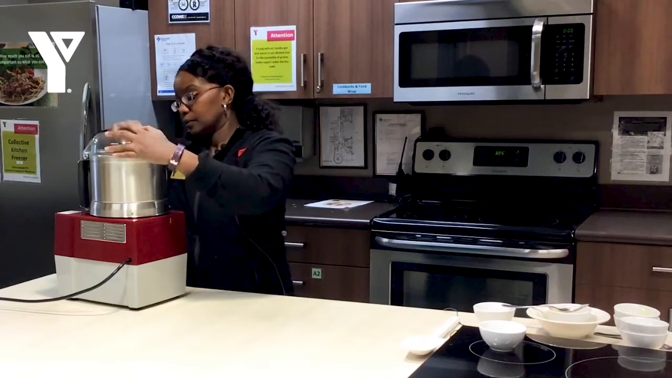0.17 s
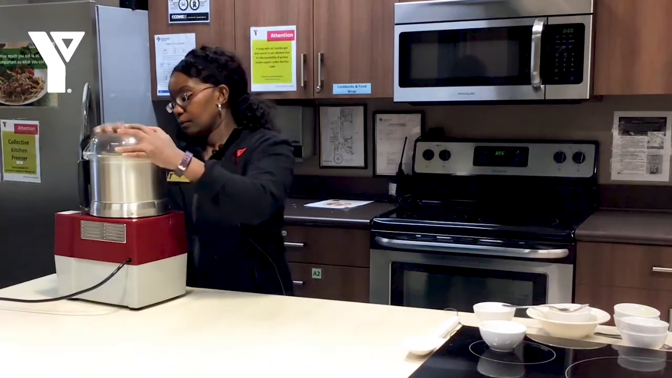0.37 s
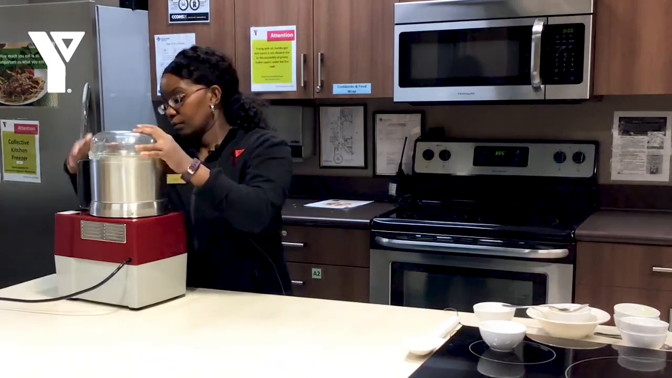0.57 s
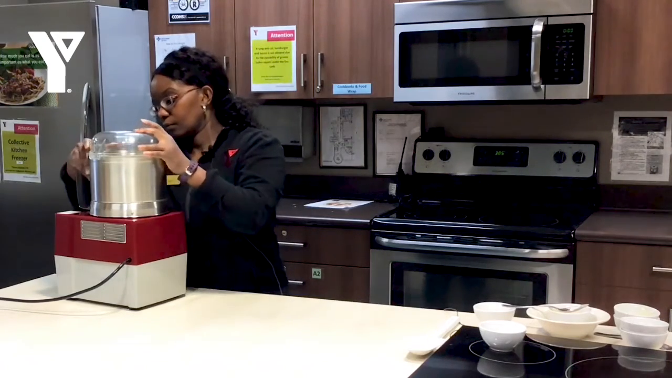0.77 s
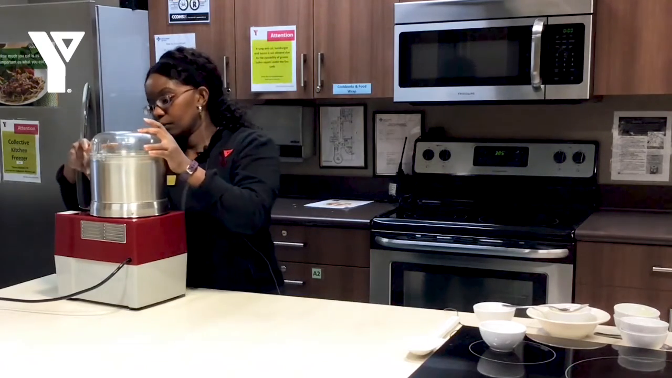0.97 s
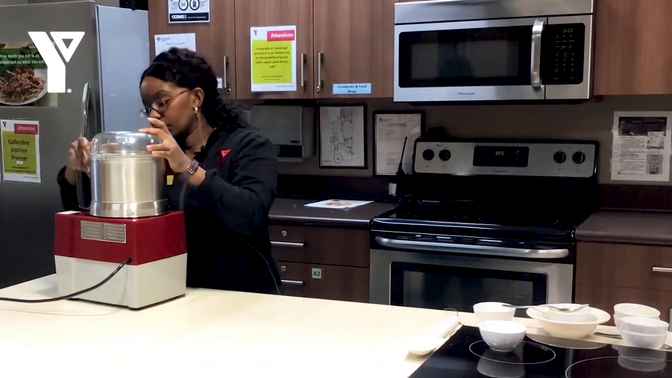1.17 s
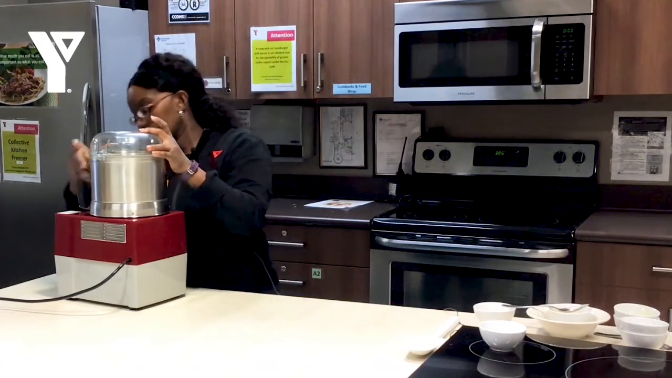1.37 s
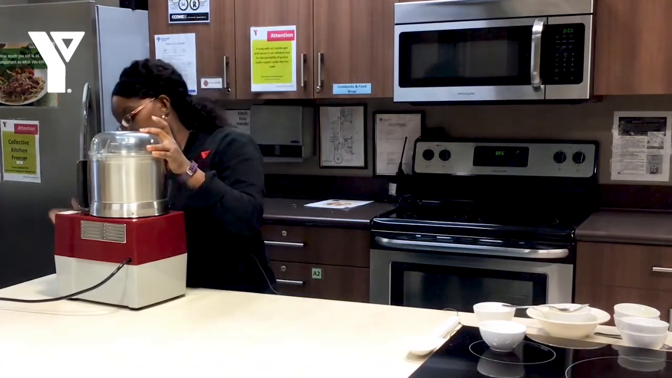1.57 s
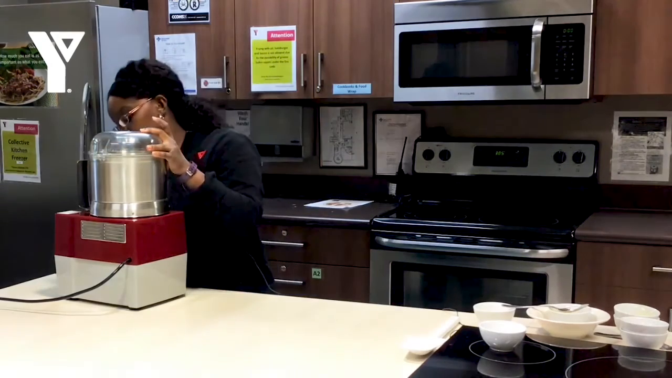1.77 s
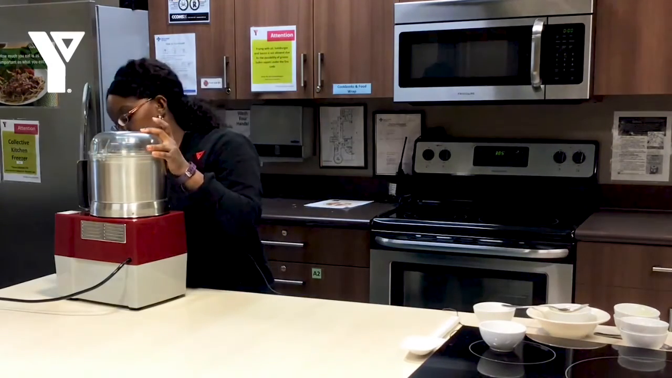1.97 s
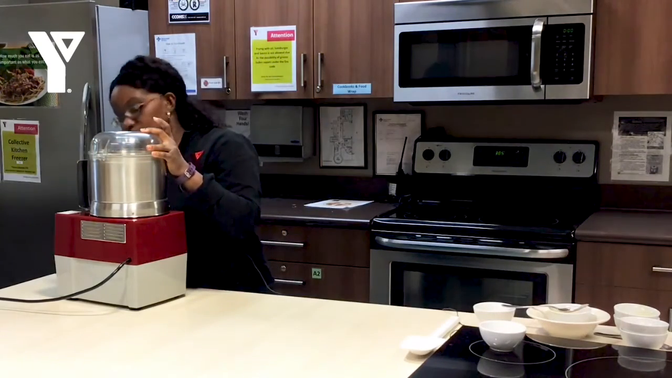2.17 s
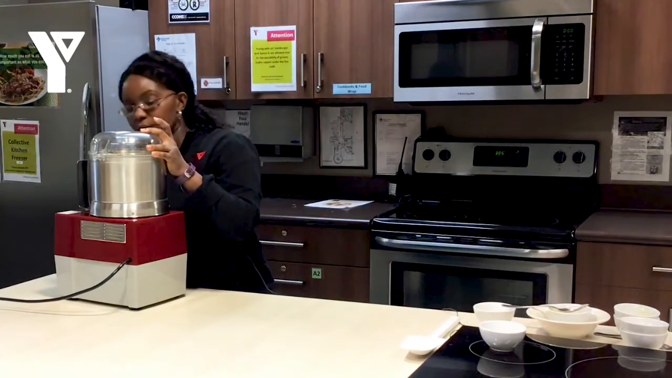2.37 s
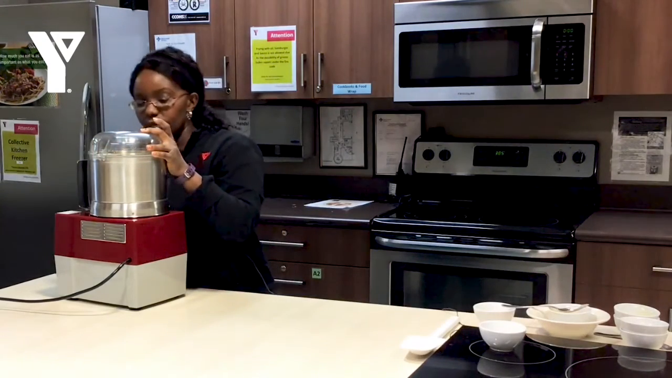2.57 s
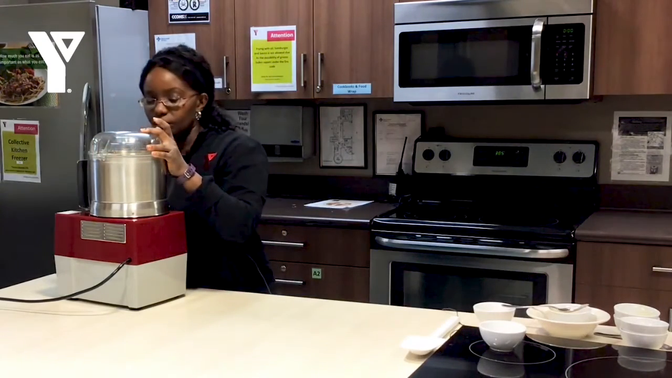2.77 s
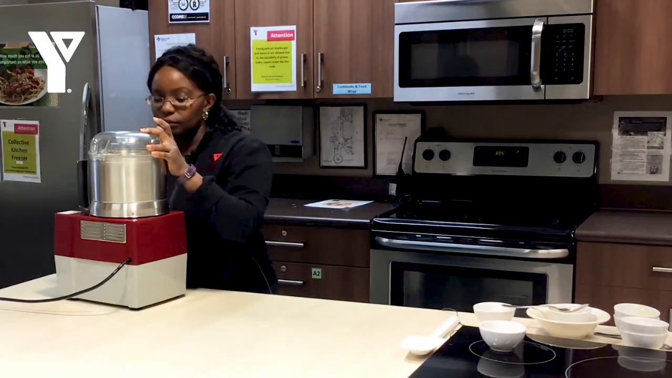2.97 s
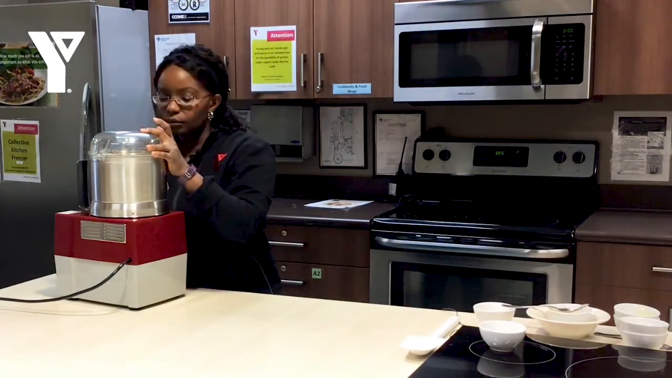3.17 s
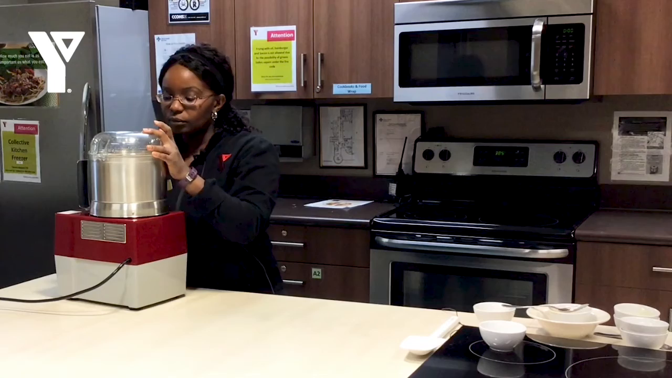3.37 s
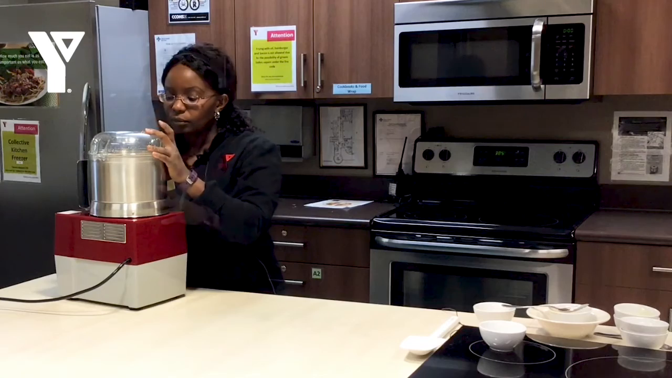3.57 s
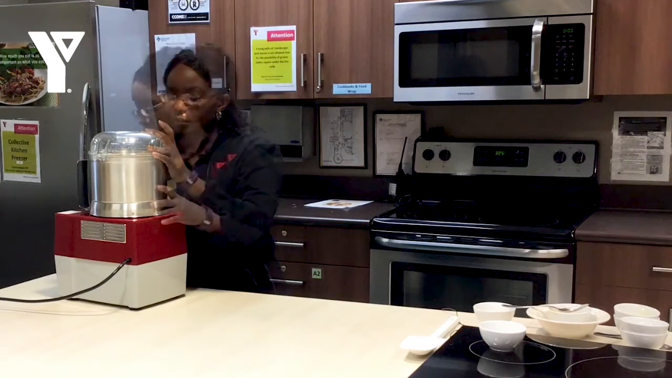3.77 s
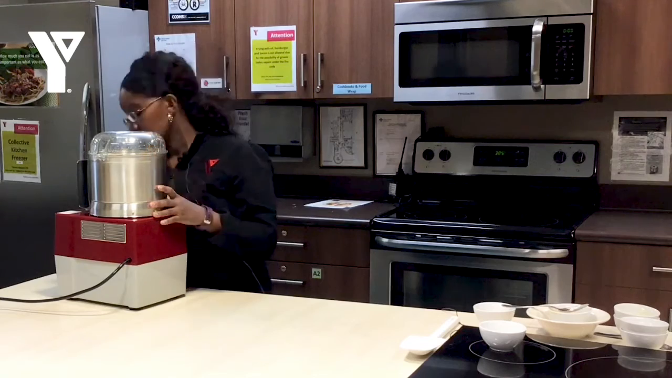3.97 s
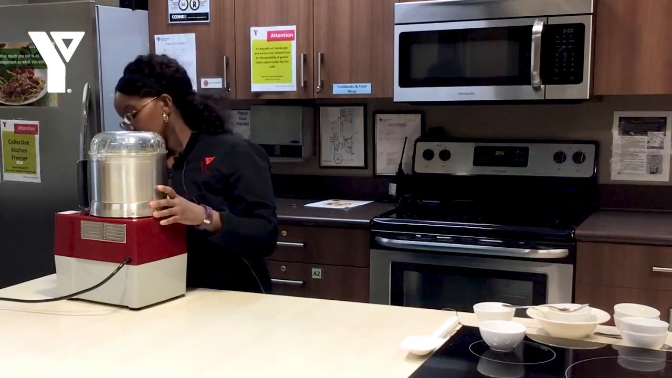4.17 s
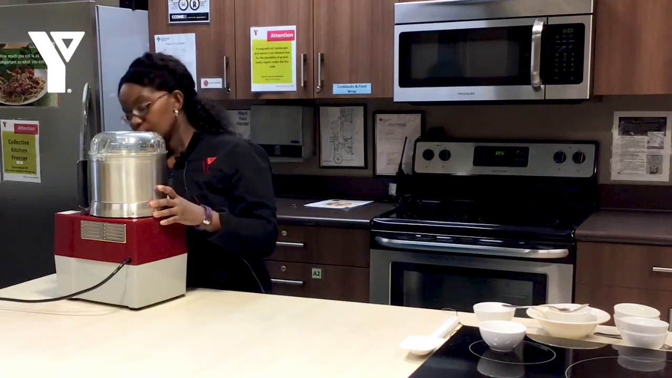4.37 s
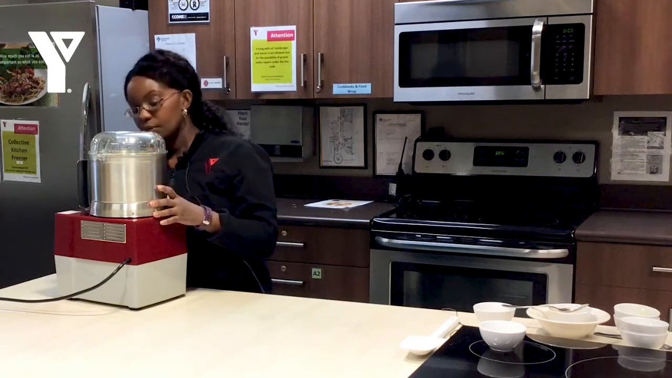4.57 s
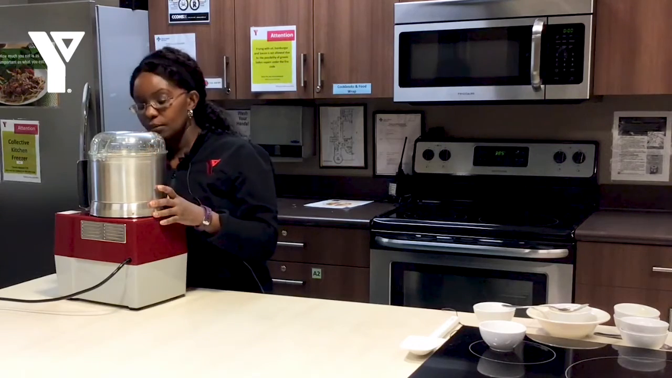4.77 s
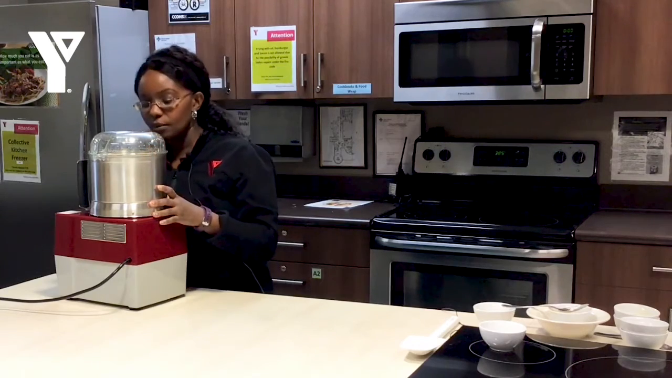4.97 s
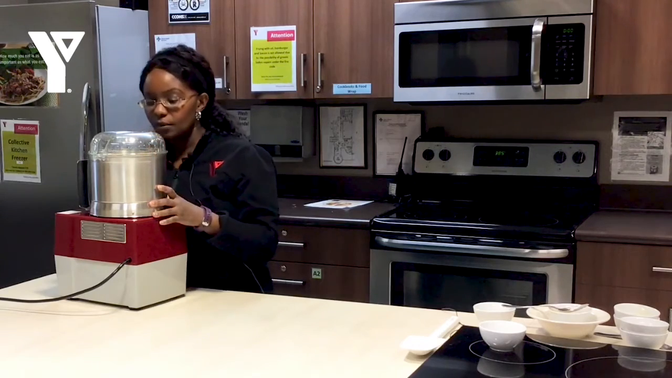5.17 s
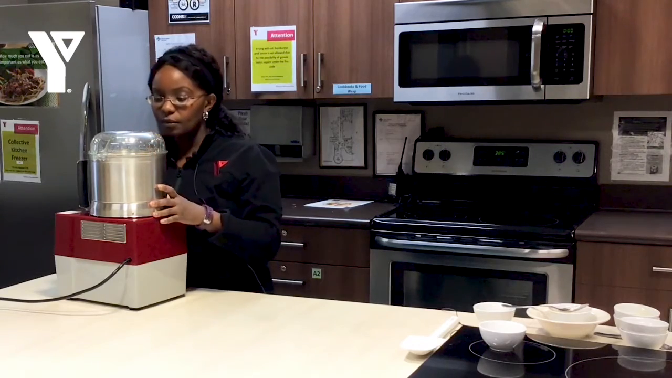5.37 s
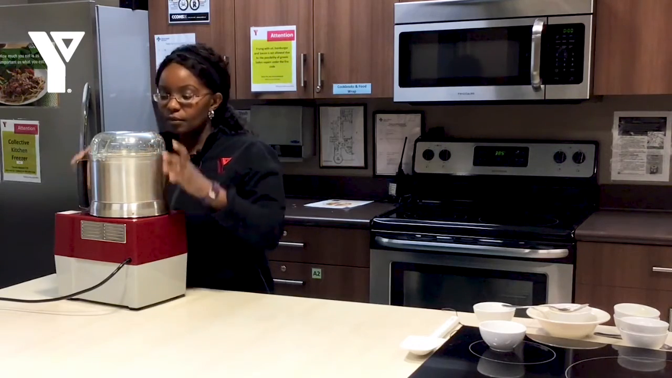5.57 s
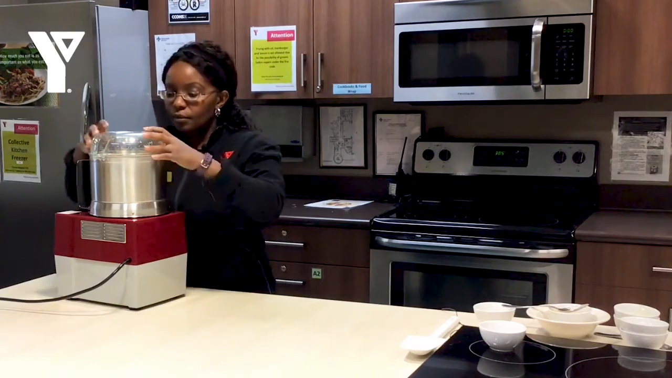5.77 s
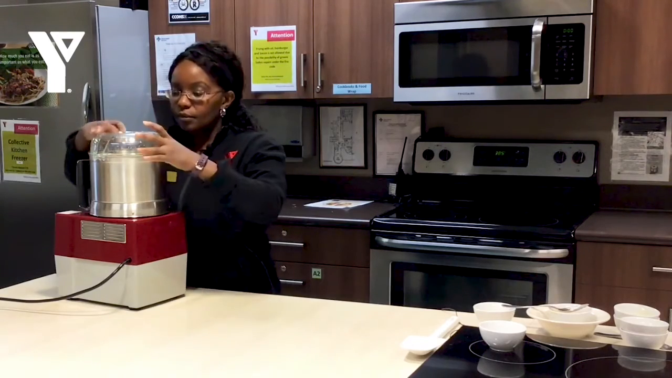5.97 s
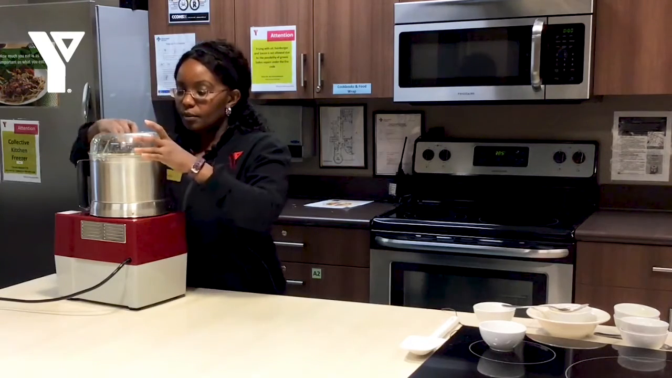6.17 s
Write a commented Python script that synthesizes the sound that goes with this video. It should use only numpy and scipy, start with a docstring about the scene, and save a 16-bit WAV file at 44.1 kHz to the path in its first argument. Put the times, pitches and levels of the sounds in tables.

```python
"""Food processor in a small kitchen

Place: a small hard room with ventilation; a steel-bowled food processor stands on the counter.
Distance: close, the direct sound well above the room. The plastic lid is slid on, knocked home and latched.
The motor starts with a clack, the blade flings food at the bowl for nearly three seconds, then coasts to rest.
Food, air and rubbing are shaped noise; hum, squeal and drone are sines; knocks are decaying noise and modes.
Microphone: the loudest blows overload it, and it hears nothing above its band limit."""
import sys
import numpy as np
from scipy import signal
from scipy.fft import rfft, irfft, next_fast_len
from scipy.io import wavfile
from scipy.ndimage import map_coordinates

SR = 44100
rng = np.random.default_rng(int(sys.argv[2]) if len(sys.argv) > 2 else 0)


def pcm_store(signal):
    """Save signal as 16-bit PCM."""
    levels = np.round(np.clip(np.atleast_2d(signal), -1, 1) * 32767)
    wavfile.write(sys.argv[1], SR, levels.astype(np.int16).T)


N = 273552

# ventilation spectrum: (frequency [Hz], relative level [dB])
AIR_SPECTRUM = [(12, -27), (20, -1.5), (70, -13), (255, -13), (285, -18), (388, -17), (472, -21),
                (678, -24.5), (738, -32), (849, -27), (1760, -41), (4810, -52), (16000, -63)]
# answer of cupboards and walls: (frequency [Hz], decay by 60 dB [s], strength [dB])
ROOM_DECAY = [(149.7, 0.14, -5.5), (497, .4, -3.5), (1500, 0.5, -3.5), (3500, .41, -4), (5000, 0.38, -5.5),
              (6840, 0.15, -5), (14040, 0.21, -9.5)]
# fingers rubbing the lid, spectrum: (frequency [Hz], relative level [dB])
RUB_SPECTRUM = [(300, -18), (600, -7), (1500, -18), (2800, -3), (5000, -4.5), (9000, -4), (13500, -7),
                (16000, -14.5)]
# strokes over the lid: (time of the top [s], level [dB], rise time constant [s],
# fall time constant [s], lower edge of the hiss [Hz])
LID_STROKES = [(.01, -50, .02, 0.048, 300), (.27, -57, 0.12, 0.19, 2000), (.51, -43.5, 0.049, 0.03, 300),
               (.94, -54, 0.071, 0.045, 297.4), (1.42, -51, 0.031, 0.018, 7490),
               (5.75, -65, 0.052, .13, 2487), (5.96, -63, 0.044, .04, 6020),
               (6.16, -45.5, 0.03, .035, 4240)]
# the lid drags on the bowl's rim: (time of the top [s], level [dB])
RIM_DRAGS = [(.21, -44.5), (.47, -41), (6.161, -50)]
# fingers tap the plastic: (time [s], clack level [dB], clack pitch [Hz], tick level [dB])
FINGER_TAPS = [(0.209, -45, 2300, -51), (.302, -45.5, 3180, -46), (.722, -54.5, 2500, -54),
               (.765, -56, 3014, -53), (1.973, -45, 1397, -62), (5.826, -57, 3820, -52)]
# the lid is knocked into place: (time [s], clack level [dB], clack pitch [Hz], tick level [dB],
# thump level [dB], thump pitch [Hz], ring level [dB], room level relative to the blow [dB])
LID_KNOCKS = [ (-.012, -14.5, 2200, -21.5, -14, 334, -18, -8.5), (.002, -15.5, 715, -37, -20, 151, -35, -7),
              (0.5093, -18, 1920, -22, -19, 193, -17, -13.5),
              (.533, -13.5, 430, -49, -19.5, 212.2, -28, -24.5),
              (.582, -12, 511, -47, -13.5, 210, -21, -21.5),
              (.867, -28.5, 1910, -23.5, -39.5, 207, -42.5, -13),
              (.970, -2.5, 2000, -7, -8.5, 763, 0.5, -14.5), (.978, 0, 905, -24.5, -9, 243, -13, -16)]
# clacks at start, switch-off and standstill: (time [s], clack level [dB], clack pitch [Hz],
# tick level [dB], thump level [dB], room level relative to the blow [dB])
DRIVE_CLACKS = [ (2.082, -3.5, 1230, -15, -5, -8.5), (2.110, -5.5, 2470, -33.5, -1.5, -24.5),
                (4.875, -7.5, 3440, -12.5, -17, -16), (5.277, -17, 1450, -47, -19.5, -19),
                (5.277, -23, 3000, -54, -45, -22), (5.297, -30, 1020, -42, -26, -8)]
# ticks of hard edges, spectrum: (frequency [Hz], relative level [dB])
TICK_SPECTRUM = [(2000, -22), (3500, 4.5), (4700, 1.5), (7000, -3), (9000, -9), (13500, -7), (16000, -18)]
# bowl and lid ringing together: (frequency [Hz], relative level [dB], decay by 60 dB [s])
RING_MODES = [(320, -10, .3), (388, -12.5, 0.28), (472, -2, 0.096), (526, 0, 0.36), (652, -5.5, 0.11),
              (754, -16.5, 0.061), (934, -9.5, 0.11), (1006, -11, .1), (1270, -19.5, 0.23),
              (1648, -29, .15), (2374, -26, .12), (3400, -24, .14), (4721, -26.5, .08)]
# mains harmonics in the motor: (frequency [Hz], relative level [dB])
HUM_HARMONICS = [(120, -12.5), (240, -2.5), (360, -3.5)]
# shaking by the unevenly loaded blade: (multiple of the shaft speed [1], level at full speed [dB])
SHAFT_SHAKE = [(1, -53.5), (3, -31.5)]
# level of the food noise, which drops near 3.8 s: (time [s], level [dB])
FOOD_LEVEL = [(2.25, -17), (2.58, -16.5), (2.85, -18.5), (3.58, -18), (3.9, -25), (4.35, -25.5), (4.72, -24),
              (4.86, -25)]
# thuds of the food on the bowl, spectrum: (frequency [Hz], relative level [dB])
CHURN_SPECTRUM = [(100, -47), (150, -22.5), (178, -12), (225, 1.5), (260, 0), (320, -5.5), (385, -5),
                  (430, -15), (520, -21), (900, -58.5)]
# crumbs on the wall before the steel rings, spectrum: (frequency [Hz], relative level [dB])
SPATTER_SPECTRUM = [(330, -18.5), (480, -6), (560, 2), (680, -0.5), (800, -4), (1150, -6), (1300, -12),
                    (1450, -16), (2000, -20.5), (2400, -17), (3200, -20), (4500, -24), (7000, -45.5)]
# fine spray, spectrum: (frequency [Hz], relative level [dB])
SPRAY_SPECTRUM = [(2500, -13), (4500, 0.5), (5500, 1.5), (7200, 1.5), (10000, -2.5), (13000, -4),
                  (15000, -11), (16000, -10.5)]
# resonances of the steel wall: (frequency [Hz], width [Hz], level [dB])
BOWL_MODES = [(535, 16, -9), (684, 54, -5), (872, 22, 4), (1095, 63, -7.5), (1236, 43, -3),
              (2376, 110, -10)]
# big lumps hit the blade: (time [s], level [dB])
BIG_LUMPS = [(2.13, -11.5), (2.319, -6.5), (2.451, -10), (2.63, -12), (3.21, -23), (3.43, -11.5),
             (3.54, -17), (4.08, -18.5), (4.282, -14.5), (4.542, -16.5), (4.67, -14.5), (4.76, -13.5),
             (5.05, -28)]
# wet food slaps the wall: (time [s], spatter level [dB], spray level [dB])
WET_SPLASHES = [(2.178, -10.5, -22), (3.428, -18.5, -33)]

ON_S, OFF_S = 2.082, 4.863  # the motor gets and loses its current
TURNS_PER_S, SPIN_UP_S, COAST_S = 59.2, 0.035, 0.42  # full speed, time constant of the start, time to rest
LID_DECAY_S, DRIVE_DECAY_S = 0.042, 0.033  # decay by 60 dB of lid and drive clacks
HOUSING_HZ = 259  # thump of the housing


def amp(db):
    """Decibels to gain."""
    return 10 ** (np.asarray(db) / 20)


def unit(x):
    """Scale to rms 1."""
    return x / np.sqrt(np.mean(x ** 2) + 1e-20)


def seconds():
    """Time of every sample [s]."""
    return np.arange(N) / SR


def since(start_s):
    """Seconds since start_s, zero before."""
    return np.maximum(seconds() - start_s, 0)


def ramp(start_s, end_s):
    """Rises from 0 at start_s to 1 at end_s."""
    return np.clip((seconds() - start_s) / (end_s - start_s), 0, 1)


def swell(top_s, rise_s, fall_s):
    """Gain that grows exponentially to 1 at top_s and dies away again."""
    t = seconds() - top_s
    return np.exp(-np.abs(t / np.where(t < 0, rise_s, fall_s)))


def wobble(rate):
    """A smooth random curve through normal knots, rate of them a second."""
    knots = rng.standard_normal(int(N * rate / SR) + 4)
    return map_coordinates(knots, [np.arange(N) * rate / SR])


def along(points, hz):
    """Interpolate (frequency [Hz], value) points on a log axis."""
    point_hz, values = np.transpose(points)
    return np.interp(np.log(hz + 1), np.log(point_hz + 1), values)


def filtered(x, response):
    """Filter x by a complex response, a function of frequency."""
    size = next_fast_len(len(x) + SR // 2)
    spectrum = rfft(x, size) * response(np.fft.rfftfreq(size, 1 / SR))
    return irfft(spectrum, size)[:len(x)]


def coloured(x, spectrum):
    """Shape x by a spectrum table, at rms 1."""
    return unit(filtered(x, lambda hz: amp(along(spectrum, hz))))


def noise(spectrum, size=N):
    """Noise of rms 1 with a spectrum."""
    return coloured(rng.standard_normal(size), spectrum)


def band_noise(centre_hz, q, size, order=1):
    """Noise of rms 1 through a resonance, applied order times; it also dulls above four times its centre."""
    def response(hz):
        damping = 1j * hz * centre_hz / q
        resonance = damping / (centre_hz ** 2 - hz ** 2 + damping)
        return resonance ** order / (1 + (hz / (4 * centre_hz)) ** 2)

    return unit(filtered(rng.standard_normal(size), response))


def impacts(rate, spread_db):
    """Random blows of either sign and uneven size, on average rate a second."""
    struck = rng.random(N) < rate / SR
    size_db = spread_db * np.minimum(rng.standard_normal(N), 2)
    return unit(struck * rng.choice([-1, 1], N) * amp(size_db))


def ventilation():
    """A steady rush of air with a faint fan tone."""
    rush = amp(-48.5 + 0.7 * wobble(6)) * noise(AIR_SPECTRUM)
    tone = np.sin(2 * np.pi * 384 * seconds() + 0.5 * wobble(1.3))
    return rush + amp(-60 + 2 * wobble(1)) * tone


def kitchen(x):
    """Cupboards and walls answer with decaying noise; each frequency dies at its own speed."""
    hz, t, grains = signal.stft(rng.standard_normal(SR // 2), SR, nperseg=256)
    t60 = along([(f, life) for f, life, db in ROOM_DECAY], hz)[:, None]
    strength_db = along([(f, db) for f, life, db in ROOM_DECAY], hz)[:, None]
    tail = signal.istft(grains * amp(strength_db - 60 * t / t60), SR, nperseg=256)[1]
    delayed = np.pad(x, (300, 0))  # samples of delay
    return signal.fftconvolve(delayed, tail / np.linalg.norm(tail))[:len(x)]


def sliding():
    """Fingers rub the lid with a fine, uneven hiss; the lid drags lower on the rim."""
    rub = noise(RUB_SPECTRUM)
    hiss = np.zeros(N)
    for top_s, db, rise_s, fall_s, edge_hz in LID_STROKES:
        above_edge = unit(filtered(rub, lambda hz: 1 - 1 / (1 + (hz / edge_hz) ** 8)))
        hiss += amp(db) * swell(top_s, rise_s, fall_s) * above_edge
    drag_gain = sum(amp(db) * swell(top_s, rise_s=0.035, fall_s=0.035) for top_s, db in RIM_DRAGS)
    drag = drag_gain * band_noise(496, q=1.6, size=N, order=2)
    return (hiss + drag) * amp(1.5 * wobble(37))


def contact(clack_db, clack_hz, tick_db, thump_db, thump_hz, ring_db, room_db, t60=LID_DECAY_S):
    """A clack with a sharp tick; it thumps the housing and counter, rings the bowl and wakes the room."""
    size = 3 * SR // 4
    t = np.arange(size) / SR
    pitched = np.sin(2 * np.pi * clack_hz * t) * np.exp(-t * clack_hz / 3)  # heavily damped: three cycles
    clack = amp(clack_db) * (0.92 * band_noise(clack_hz, q=2.4, size=size) + 1.9 * pitched)
    tick = amp(tick_db) * noise(TICK_SPECTRUM, size)
    snap = (clack + tick) * amp(-60 * t / t60) * (1 - np.exp(-t / 0.001))

    body = np.sin(2 * np.pi * thump_hz * t) + 1.1 * band_noise(thump_hz, q=1.7, size=size, order=2)
    thump = amp(thump_db - 60 * t / 0.12) * body * (1 - np.exp(-t / 0.01))

    ring = np.zeros(size)
    for hz, db, life in RING_MODES:
        mode_gain = amp(db + rng.normal(0, 1) - 60 * t / life)
        ring += mode_gain * np.sin(2 * np.pi * (hz * t + rng.random()))
    held = (0.1 + np.exp(-t / 0.011)) * (1 - np.exp(-t / 0.0003))  # the seated lid soon damps most of it

    hit = snap + thump + amp(ring_db) * ring * held
    little_bass = signal.butter(2, 120, "highpass", fs=SR, output="sos")  # small parts radiate little bass
    hit = signal.sosfilt(little_bass, hit)
    boom_gain = amp(thump_db - 26 - 60 * t / 0.7) * (1 - np.exp(-t / 0.006))
    counter_boom = boom_gain * band_noise(31, q=1.6, size=size, order=2)
    return hit + counter_boom + amp(room_db) * kitchen(hit)


def contacts():
    """Lid knocks, machine clacks and finger taps, each at its moment."""
    hits = [(s, contact(*blow)) for s, *blow in LID_KNOCKS]
    for s, db, hz, tick_db, thump_db, room_db in DRIVE_CLACKS:
        hits.append((s, contact(db, hz, tick_db, thump_db, HOUSING_HZ, db - 31, room_db, DRIVE_DECAY_S)))
    for s, db, hz, tick_db in FINGER_TAPS:
        hits.append((s, contact(db, hz, tick_db, db - 1.5, HOUSING_HZ, db - 15.5, room_db=-16.5)))
    out = np.zeros(N + 2 * SR)  # a second of margin at both ends
    for s, hit in hits:
        start = SR + round(s * SR)
        out[start:start + len(hit)] += hit
    return out[SR:SR + N]


def pace():
    """Share of full speed: a quick spin-up, then friction slows the blade evenly after switch-off."""
    return (1 - np.exp(-since(ON_S) / SPIN_UP_S)) * (1 - ramp(OFF_S, OFF_S + COAST_S))


def shaft_angle():
    """Angle of the slightly unsteady shaft [rad]."""
    return 2 * np.pi * np.cumsum(TURNS_PER_S * pace() * (1 + 0.013 * wobble(12))) / SR


def driven(usual_db, per_level_db, speed_power):
    """Gain that follows the food level and speed: usual_db at the mean food level, per_level_db gained per dB
    of it."""
    level_db = np.interp(seconds(), *np.transpose(FOOD_LEVEL))
    return amp(usual_db + per_level_db * (level_db - level_db.mean())) * pace() ** speed_power


def motor():
    """Windings hum on mains multiples, surging at the start; the unevenly loaded blade shakes the housing."""
    t = seconds()
    hum = sum(amp(db + 2.3 * wobble(8.5)) * np.sin(2 * np.pi * hz * t + 0.083 * wobble(5.5))
              for hz, db in HUM_HARMONICS)
    surge = amp(9.8 * np.exp(-since(ON_S) / 0.52))
    current = surge * (1 - ramp(OFF_S - 0.03, OFF_S))
    turn = shaft_angle()
    shake = sum(amp(db + 2.3 * wobble(14)) * np.sin(k * turn) for k, db in SHAFT_SHAKE)
    shake_gain = pace() ** 3 * (1 - ramp(OFF_S, OFF_S + 0.08))
    # the hum is louder after the food noise drops
    hum_gain = driven(-32, per_level_db=-1.6, speed_power=0.3)
    return hum_gain * current * hum + shake * shake_gain


def rocking():
    """The start jolts the housing on its feet; it settles to a slight rocking."""
    sway = noise([(15, 7), (35, 5.5), (60, 10), (100, -11.5), (160, -26.5)])  # (Hz, relative dB)
    steady, jolt = amp(-47.5), amp(-26.5) * np.exp(-since(ON_S) / 0.15)
    return sway * pace() * (steady + jolt)


def coasting():
    """The slowing blade leaves the housing droning at one wavering pitch."""
    drone = np.sin(2 * np.pi * 252 * seconds() + 0.5 * wobble(30))
    return amp(-21.5) * ramp(OFF_S, OFF_S + 0.27) * pace() * drone


def squeal():
    """The blade drags through the resting food with a squeal that falls from 2120 Hz."""
    start_s, length_s, octaves_per_s = 2.110, 0.063, 24
    hz = 2120 * 2 ** (-octaves_per_s * since(start_s)) * (1 + 0.0079 * wobble(300))
    arch = np.sqrt(np.abs(np.sin(np.pi * ramp(start_s, start_s + length_s))))
    return arch * amp(-26 + 1.8 * wobble(200)) * np.sin(2 * np.pi * np.cumsum(hz) / SR)


def sizzle():
    """The treble of the spray: a fizz that fades after the start and a narrow, climbing hiss."""
    top_s, top_hz, climb_hz_per_s, width_hz = 4.5, 7051, 601.5, 599
    phase = 2 * np.pi * np.cumsum(top_hz + climb_hz_per_s * (seconds() - top_s)) / SR
    # slow noise on a carrier and its quadrature makes a narrow moving band
    narrow = unit(wobble(2 * width_hz) * np.cos(phase) + wobble(2 * width_hz) * np.sin(phase))
    # the absolute value in swell takes the sign off fall_s
    hiss = amp(-42.5) * swell(top_s, rise_s=2.8, fall_s=-0.5) * narrow
    fizz = band_noise(12900, q=3, size=N, order=2) * np.exp(-since(ON_S) / 0.7)
    return (hiss + amp(-36.5) * fizz) * pace() ** 2


def chips(speed):
    """A few times a turn a hard bit strikes the wall and rings a high mode; the bits are ground down."""
    t = np.arange(SR // 10) / SR
    pings = np.zeros(N)
    # (frequency [Hz], relative level [dB], decay by 60 dB [s])
    for hz, db, t60 in [(2362, 4.5, 0.028), (2620, 0.5, 0.016), (2854, -5.5, 0.011), (4700, -33.5, 0.02)]:
        ring = unit(np.sin(2 * np.pi * hz * t) * amp(-60 * t / t60))
        pings += amp(db) * signal.fftconvolve(impacts(3 * speed, spread_db=5.5), ring)[:N]
    wear_db_per_s = 7
    return unit(pings) * amp(-31.5 - wear_db_per_s * since(ON_S)) * pace() ** 1.5


def steel(hz):
    """The bowl wall passes every blow and rings on at its resonances."""
    response = 1
    for centre_hz, width_hz, db in BOWL_MODES:
        damping = 1j * hz * width_hz
        response = response + amp(db) * damping / (centre_hz ** 2 - hz ** 2 + damping)
    return response


def blending():
    """Two blade tips sweep the food round: lumps thud, crumbs spatter on the steel, fine spray hisses."""
    speed = TURNS_PER_S * pace()  # turns per second
    turn = shaft_angle()
    sweep = 1 + 0.078 * np.cos(turn) + 0.054 * np.cos(2 * turn)  # each passing tip throws a small burst
    tumble = wobble(28)  # food falls back on the blade in clumps

    lumps = coloured(impacts(30 * speed, spread_db=0.5) * sweep ** 2, CHURN_SPECTRUM)
    lumps = lumps * amp(0.44 * tumble)
    crumbs = coloured(impacts(60 * speed, spread_db=0.5) * sweep, SPATTER_SPECTRUM)
    crumbs = unit(filtered(crumbs, steel)) * amp(0.16 * tumble + 1.4 * wobble(60))
    scrape = band_noise(1870, q=0.78, size=N, order=3) * sweep ** 2 * amp(2.8 * wobble(160))
    spray = noise(SPRAY_SPECTRUM) * sweep * amp(0.5 * tumble + 0.6 * wobble(200))

    thuds = sum(amp(db) * swell(s, rise_s=0.014, fall_s=0.019) for s, db in BIG_LUMPS) * (speed > 0)
    slap, mist = np.zeros(N), np.zeros(N)
    for s, spatter_db, spray_db in WET_SPLASHES:
        splash = swell(s, rise_s=0.027, fall_s=0.022) * pace()
        slap += amp(spatter_db) * splash
        mist += amp(spray_db) * splash

    # single events add to the steady gains as powers
    churn_gain = np.hypot(driven(-18.5, per_level_db=0.86, speed_power=1), thuds)
    spatter_gain = np.hypot(driven(-24, per_level_db=0.81, speed_power=1.54), slap)
    spray_gain = np.hypot(driven(-37.5, per_level_db=0.55, speed_power=1.9), mist)
    # the scrape is louder after the food noise drops
    scrape_gain = driven(-40, per_level_db=-1.53, speed_power=2.1)
    food = churn_gain * lumps + spatter_gain * crumbs + spray_gain * spray
    return food + scrape_gain * scrape + chips(speed)


def scene():
    """Machine and handling in the room, over the ventilation."""
    machine = blending() + sizzle() + rocking() + squeal() + coasting()
    machine_in_room = machine + amp(-19.5) * kitchen(machine)
    return (ventilation() + sliding() + contacts() + motor() + machine_in_room)[None]


def record(dry):
    """The microphone flattens the highest peaks and keeps nothing above its band limit."""
    top, hardness, limit_hz = 0.87, 8, 15800
    clipped = dry[0] / (1 + np.abs(dry[0] / top) ** hardness) ** (1 / hardness)
    return filtered(clipped, lambda hz: 1 / (1 + (hz / limit_hz) ** 160))[None]


dry = scene()
out = record(dry)
pcm_store(out)
```